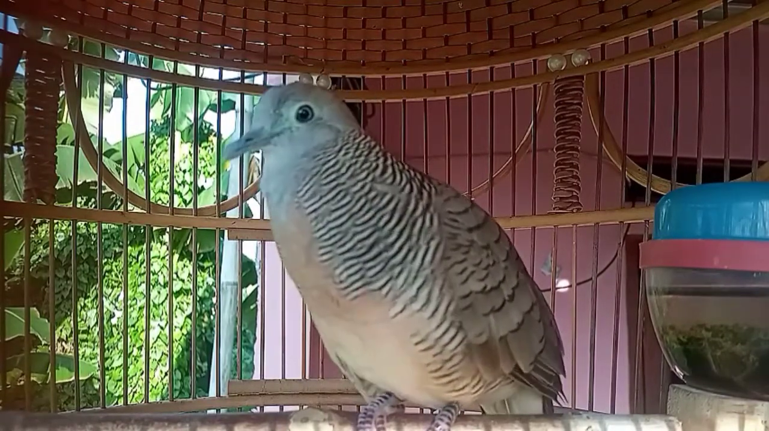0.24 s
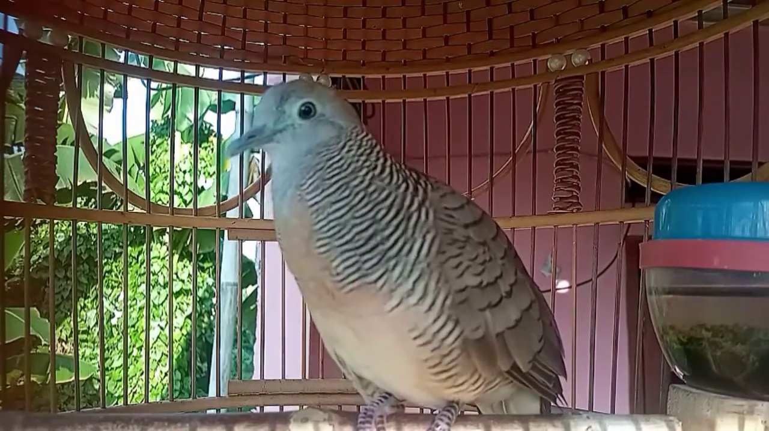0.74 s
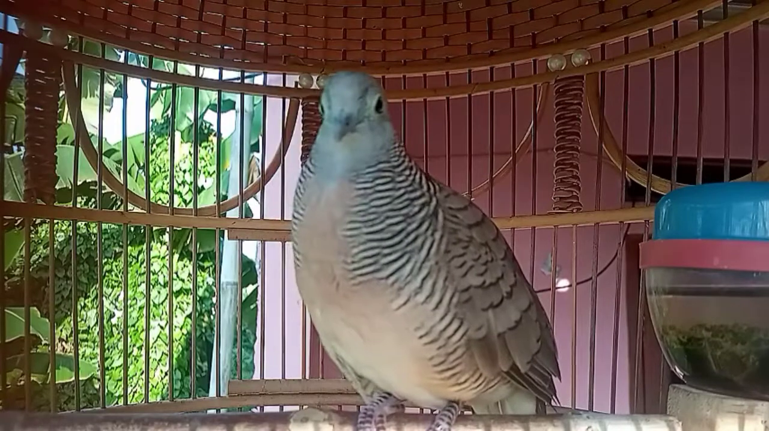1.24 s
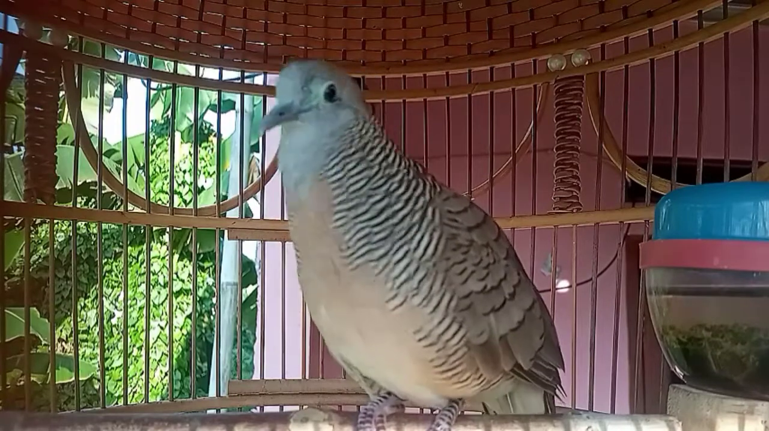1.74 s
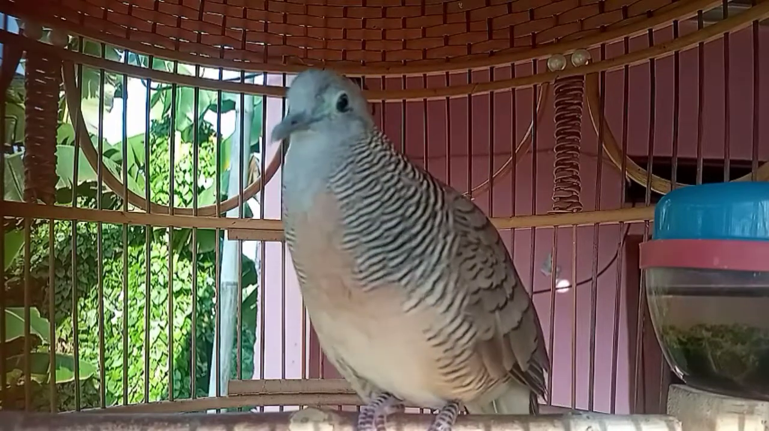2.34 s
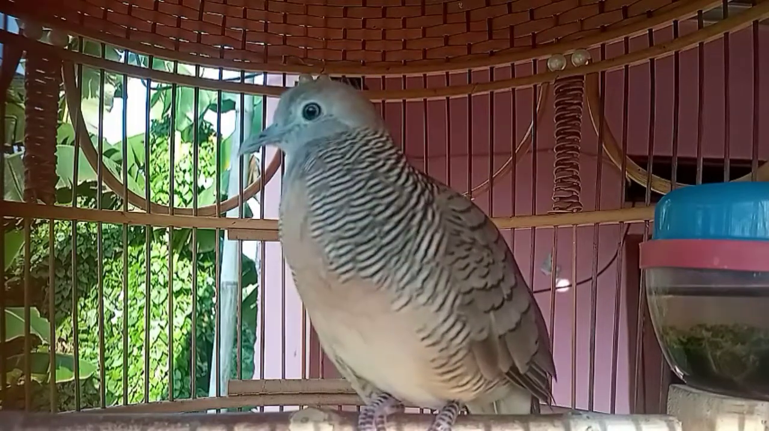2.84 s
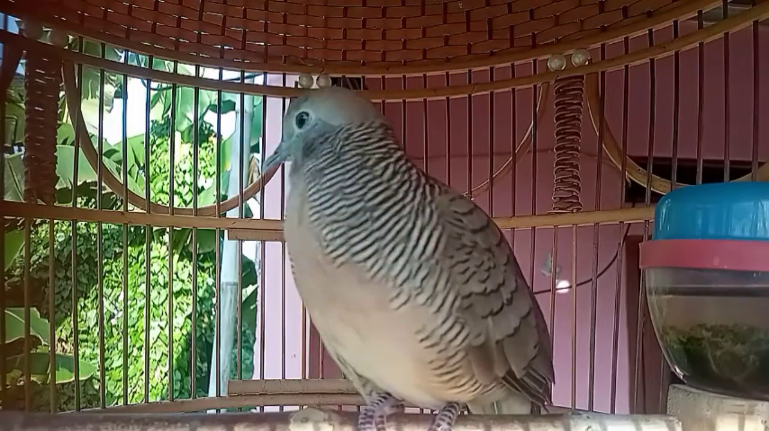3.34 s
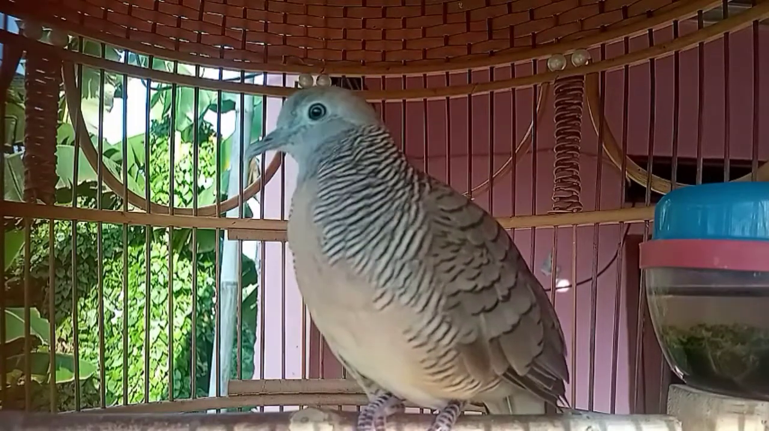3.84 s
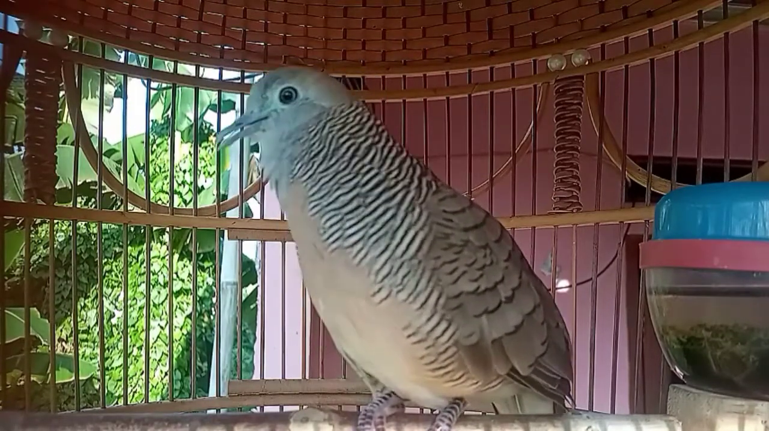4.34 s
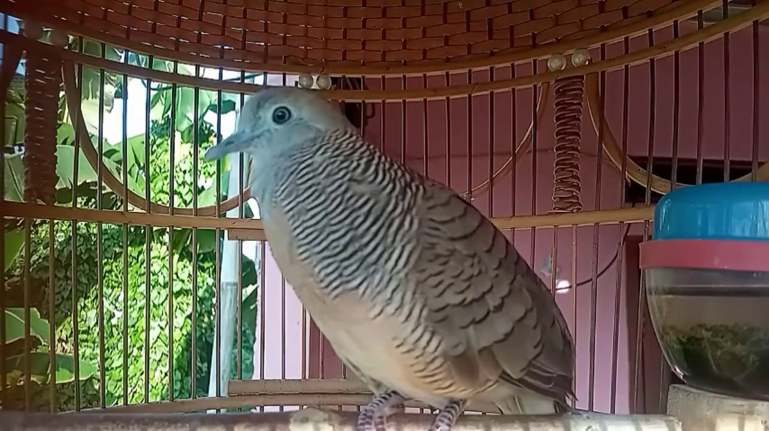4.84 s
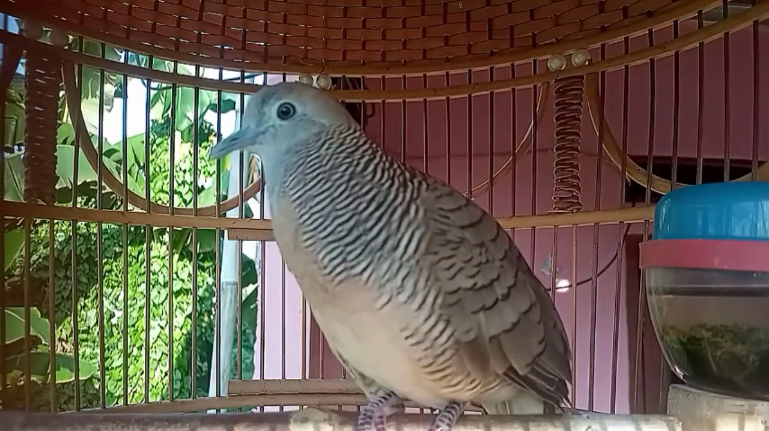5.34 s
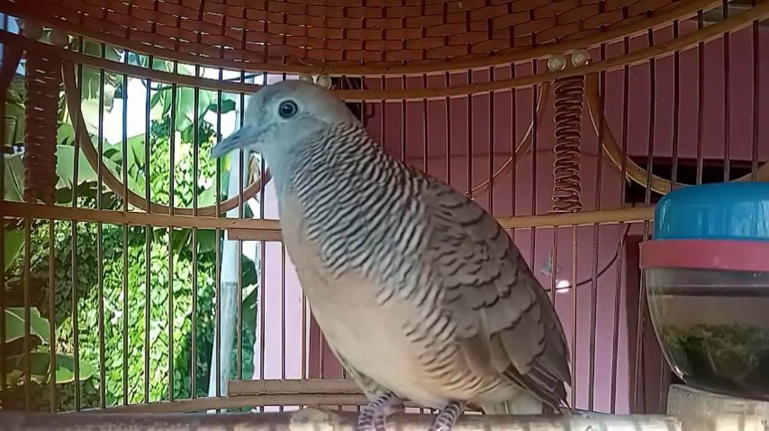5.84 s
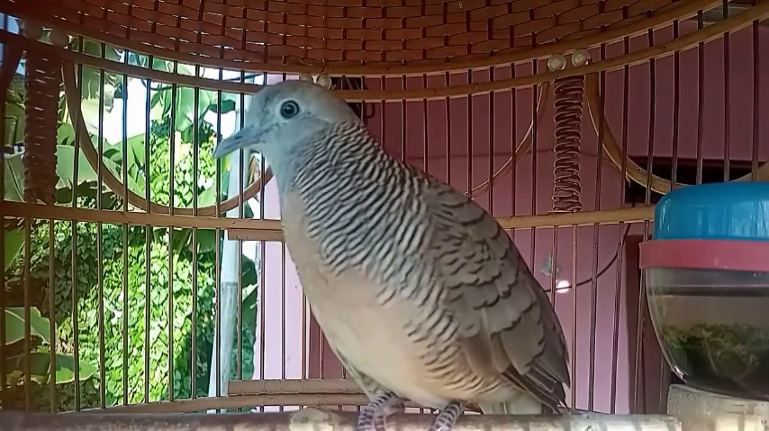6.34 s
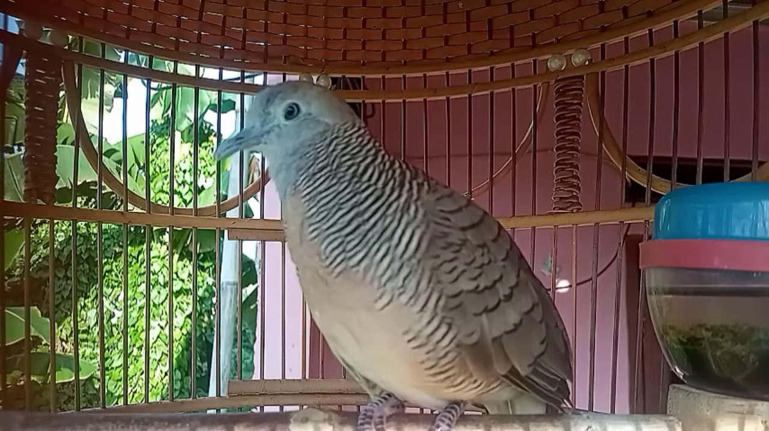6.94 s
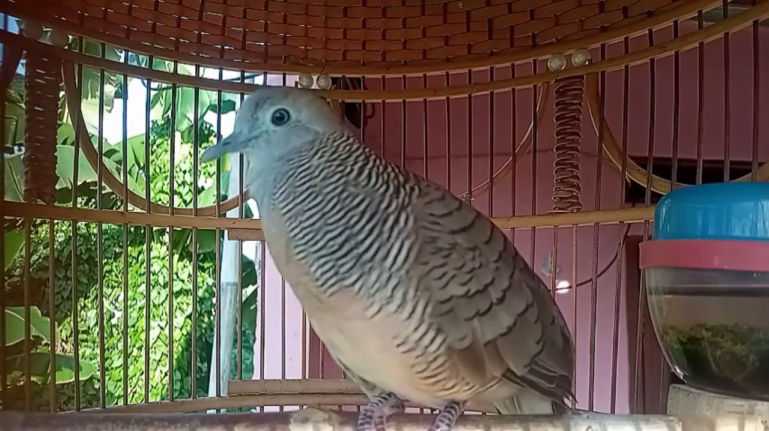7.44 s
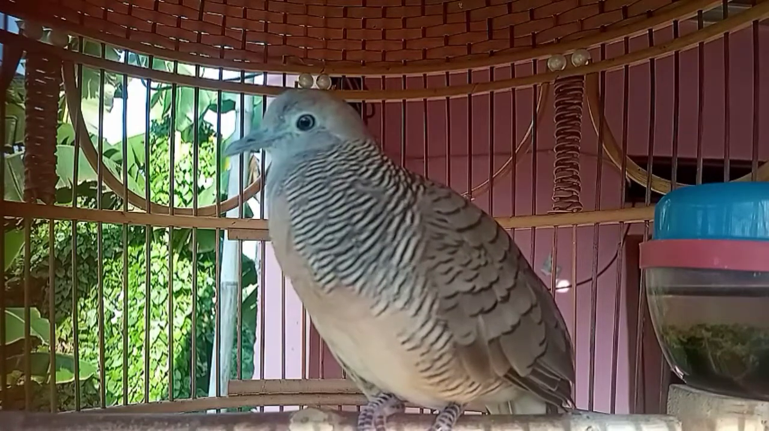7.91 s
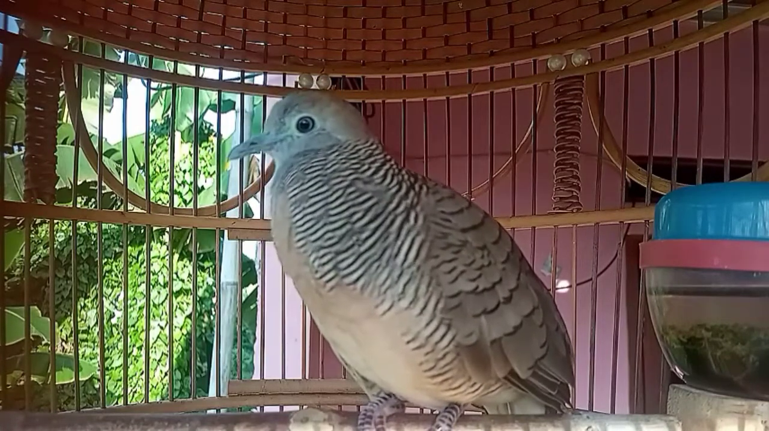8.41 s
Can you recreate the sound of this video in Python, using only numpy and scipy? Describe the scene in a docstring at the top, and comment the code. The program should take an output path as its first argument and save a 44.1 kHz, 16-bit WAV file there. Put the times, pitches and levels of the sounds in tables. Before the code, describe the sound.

Outdoors on a sheltered porch, a steady thin insect shrill and airy hiss sit over soft, surging traffic rumble. At 0 s a close dove is finishing a loud phrase as a neighbouring dove begins an even trill of short, hollow, popping coos, about six a second, until 1.4 s. A fainter far dove runs through seven slowing coos from 0.65 s, and a songbird flicks bright whistles from 0.85 to 2 s. Dry cage ticks fall occasionally. The close dove's quick four-note phrase, creaky at its onsets, comes at 1.7 s, louder at 4.4 s and again at 7.1 s. Twitter rasps near 2.1-2.5 s; another dove coos at 2.7-3.6 s. The trill returns at 4.9-6.5 s, with twitter at 5.2-5.8 s. Faint hoots and chips follow at 6 s, then songbird whistles from 6.3 s and the far run from 7 to 8.2 s, leaving insects and traffic.

```python
"""Caged zebra doves coo on a porch over shrill insects (narrow noise), rumbling traffic and air (wide noise).
A close dove is mid-phrase as a trilling dove starts beside it; gliding tones with overtones make each coo.
A far dove's slowing run and a songbird's bending whistles follow, then cage ticks (noise bursts), twitter,
and a dove to the left near 3 s. The trill returns near 5 s, then the songbird and the far run near 7 s.
Loud peaks, chiefly the close dove's phrases, drive a limiter that ducks the whole mix."""
import sys
import numpy as np
from scipy import signal
from scipy.fft import rfft, irfft, next_fast_len
from scipy.io import wavfile
from scipy.ndimage import uniform_filter1d, map_coordinates

SR = 44100
rng = np.random.default_rng(int(sys.argv[2]) if len(sys.argv) > 2 else 0)


def dump_mix(stems):
    """Bounce the given channels to the path in sys.argv[1] as a 16-bit WAV at rate SR."""
    frames = np.atleast_2d(stems).T  # one column per channel
    limited = np.clip(frames, -1, 1)  # hard clip at full scale
    pcm = np.round(limited * 32767).astype(np.int16)
    wavfile.write(sys.argv[1], SR, pcm)


N = 382347

# each time the close dove sings its phrase: (time [s], stretch of the rhythm [ratio], relative level [dB])
PHRASE_STARTS = [(-.345, 1.005, -0.5), (1.684, 1.01, 1.2), (4.373, 0.94, 4), (7.081, 1, 2.5)]
# throat colour of the close and trilling doves' creaks: (frequency [Hz], gain [dB])
THROAT_COLOUR = [(300, -25.5), (700, -10.5), (1150, 4.5), (1600, -8.5), (2200, -33), (4000, -39),
                 (9000, -61)]


def amp(db):
    """Decibels to gain."""
    return 10 ** (np.asarray(db) / 20)


def unit(x):
    """Scale to rms 1."""
    return x / np.sqrt(np.mean(x ** 2) + 1e-20)


def along(points, hz):
    """Read (frequency, value) points on a log frequency axis."""
    f, v = np.transpose(points)
    return np.interp(np.log(hz + 1), np.log(f + 1), v)


def curves(rows):
    """One value per sample for each column after the time."""
    s, *cols = np.transpose(rows)
    return [np.interp(np.arange(N) / SR, s, c) for c in cols]


def wobble(rate, size=N):
    """A smooth random curve, rate knots a second."""
    knots = rng.standard_normal(int(N * rate / SR) + 4)
    return map_coordinates(knots, [np.arange(size) * rate / SR])


def filtered(x, response):
    """Shape x with a complex response of frequency."""
    m = next_fast_len(N + SR // 2)
    return irfft(rfft(x, m) * response(np.fft.rfftfreq(m, 1 / SR)), m)[..., :N]


def add(track, s, sound):
    """Mix a sound into a track at time s."""
    at = round(s * SR) + np.arange(len(sound))
    inside = (at >= 0) & (at < N)
    track[at[inside]] += sound[inside]


def pan(lean_db):
    """Left and right gains; the left is lean_db louder."""
    return amp([[lean_db / 2], [-lean_db / 2]])


def noise(gain, alike):
    """Stereo noise of rms 1 with a given colour and left-right likeness."""
    turn = np.arccos(np.clip(alike, -1, 1)) / 2
    mid, side = filtered(rng.standard_normal((2, N)), gain) * [[np.cos(turn)], [np.sin(turn)]]
    return unit(np.array([mid + side, mid - side]))


def placed(x, lean_db, wet_db):
    """The direct sound and the porch's diffuse tail: stereo noise that decays at its own pace in each band."""
    # porch decay: (frequency [Hz], time to fall 60 dB [s]); times under 0.02 s are raised to it
    porch_decay = [(200, 0.16), (1200, 0.45), (3500, 0.35), (7000, 0.42), (12000, 0.014)]
    hz, t, z = signal.stft(rng.standard_normal((2, SR // 2)), SR, nperseg=256)
    t60 = np.maximum(along(porch_decay, hz), .02)[:, None]
    tail = signal.istft(z * amp(-60 * t / t60), SR, nperseg=256)[1]
    room = signal.fftconvolve(x[None], tail / np.linalg.norm(tail[0]), axes=1)[:, :N]
    return pan(lean_db) * (x + amp(wet_db) * room)


def resonance(f, hz, width):
    """The response of one ringing hollow."""
    return 1j * f * width / (hz * hz - f * f + 1j * f * width)


def reflections(f, echoes):
    """The response of delayed copies, one for each (delay [s], level [dB])."""
    return sum(amp(db) * np.exp(-2j * np.pi * f * delay) for delay, db in echoes)


def bouts(rows, rest_db, edge_s):
    """A gain that rests low and rises smoothly for each (start [s], end [s], level [dB])."""
    t = np.arange(N) / SR
    gain = amp(rest_db)
    for start, end, db in rows:
        gain = gain + amp(db) * (np.tanh((t - start) / edge_s) - np.tanh((t - end) / edge_s)) / 2
    return gain


def open_air():
    """The hiss of open air: coloured noise whose level barely wavers."""
    # air colour: (frequency [Hz], relative level [dB])
    air_colour = [(300, -8.5), (750, -4), (1300, -12.5), (2000, -10.5), (3000, -15), (4500, 3.5),
                  (5700, 3.5), (7000, 5), (8300, -9), (9500, -4), (11200, -31), (12200, -55), (15500, -18)]
    hiss = noise(lambda f: amp(along(air_colour, f)), alike=0.023)
    return amp(-51.5 + 0.4 * wobble(3.4)) * pan(10.4) * hiss


def rumble():
    """Traffic noise whose deep, middle and upper bass each surge on their own."""
    # rumble colour: (frequency [Hz], relative level [dB])
    rumble_colour = [(25, -28), (55, -8.5), (95, 1), (125, 4.5), (190, -10), (320, -22.5), (600, -60.5)]
    surge_db = 3.2
    bands = [(0, 80), (80, 140), (140, 1000)]  # Hz
    steady = noise(lambda f: amp(along(rumble_colour, f)), alike=0.99)
    surging = 0
    for lo, hi in bands:
        surging = surging + amp(surge_db * wobble(9.8)) * filtered(steady, lambda f: (f >= lo) & (f < hi))
    return unit(surging)


def traffic():
    """Distant traffic: the surging rumble on a slow swell."""
    # rumble swell: (time [s], relative level [dB])
    rumble_swell = [(0, -58.5), (1, -56.5), (1.55, -53.5), (4.2, -49), (5.4, -53), (6.5, -49.5),
                    (7.4, -54.5), (8.1, -48.5), (8.67, -49)]
    swell_db, = curves(rumble_swell)
    return amp(swell_db + 5.5) * pan(4.2) * rumble()


def tyres():
    """The hum of tyres on a far road: coloured noise that swells and wavers."""
    # tyre hum colour: (frequency [Hz], relative level [dB])
    tyre_colour = [(120, -30), (210, -6.5), (320, -2), (430, -13), (600, -19), (1200, -22), (2200, -24.5),
                   (4000, -42)]
    # tyre hum swell: (time [s], relative level [dB])
    tyre_swell = [(0.0, -73), (1.49, -61.5), (1.76, -73), (2.77, -59.5), (4.83, -67), (6.88, -59.5),
                  (7.12, -64), (8.31, -55), (8.67, -54)]
    swell_db, = curves(tyre_swell)
    hum = noise(lambda f: amp(along(tyre_colour, f)), alike=0.43)
    return amp(swell_db + 6.5 + 3.1 * wobble(7)) * pan(4.6) * hum


def sparrow_chatter():
    """Far sparrows merged into a band of noise that flickers in bouts."""
    # chatter colour: (frequency [Hz], relative level [dB])
    chatter_colour = [(2000, -21), (2800, -0.5), (3500, 2), (4200, -1), (5200, -43)]
    # bouts of chatter: (start [s], end [s], relative level [dB])
    chatter_bouts = [(-.1, .25, -70), (1.45, 1.8, -61), (2.3, 2.94, -51), (3.08, 3.2, -51),
                     (3.39, 3.47, -64), (4.74, 4.9, -69), (6.2, 6.36, -54.5), (6.82, 6.98, -54.5),
                     (8.4, 8.8, -62)]
    chatter = noise(lambda f: amp(along(chatter_colour, f)), alike=0.13)
    flicker = amp(6.5 + 3.26 * wobble(14))
    return bouts(chatter_bouts, rest_db=-67.5, edge_s=0.058) * flicker * pan(9.6) * chatter


def insect_band(f, hz, width):
    """The response of a narrow peak that halves 0.74 width to either side."""
    return 1 / (1 + ((f - hz) / (0.74 * width)) ** 2)


def insect_shrill():
    """Steady shrilling: narrow bands of noise, each with its own place."""
    # shrill bands: (centre [Hz], nominal width [Hz], level [dB], left over right [dB])
    shrill_bands = [(6467, 180, -43, 14), (10493, 342, -41, -9), (9995, 430, -48.5, -7)]
    return sum(amp(db) * pan(lean_db) * noise(lambda f: insect_band(f, hz, width), alike=0.028)
               for hz, width, db, lean_db in shrill_bands)


def insect_whine():
    """A thin whine of very narrow noise lines that comes and goes."""
    # whine lines: (frequency [Hz], relative level [dB])
    whine_lines = [(4430, -10.5), (5118, 0), (5700, -8), (7080, -11.5)]
    # bouts of whine: (start [s], end [s], level [dB])
    whine_bouts = [(2.3, 2.85, -47.5), (3.45, 3.8, -50.5), (3.82, 4.65, -50), (5.92, 6.7, -45)]
    lines = lambda f: sum(amp(db) * insect_band(f, hz, 28) for hz, db in whine_lines)
    return bouts(whine_bouts, rest_db=-57.5, edge_s=0.027) * noise(lines, alike=0.031)


def cage_ticks():
    """Short dry knocks of the cane bars: fast-fading noise through wood, each with a bright edge."""
    # ticks: (time [s], knock level before the wood [dB], edge level before its filter [dB])
    tick_rows = [(0.935, -55, -37), (1.487, -41, -37), (3.768, -63, -50.5), (3.929, -103, -37),
                 (5.59, -63, -39.5), (6.718, -55, -37.5), (8.483, -74, -46)]
    # colour of the cage wood: (frequency [Hz], gain [dB])
    wood_colour = [(200, -20), (700, -11), (1400, 11), (2200, -52), (4000, -51)]
    knock, edge, t = np.zeros(N), np.zeros(N), np.arange(SR // 10) / SR
    knock_t60_s, edge_t60_s = 0.018, 0.054
    for s, knock_db, edge_db in tick_rows:
        add(knock, s, amp(knock_db - 60 * t / knock_t60_s) * rng.standard_normal(len(t)))
        add(edge, s, amp(edge_db - 60 * t / edge_t60_s) * rng.standard_normal(len(t)))
    wood = filtered(knock, lambda f: amp(along(wood_colour, f)))
    snap = filtered(edge, lambda f: 1 / (1 + (f / 7500) ** 4) / (1 + (2200 / (f + 1)) ** 4))
    return placed(wood + snap, lean_db=32.0, wet_db=-10.5)


def whistles(rows, rasp, turn=.5, swell_db=0, flutter_hz=400):
    """Tones that bend through three pitches and swell or fade on the way, with a quick random flutter."""
    song = np.zeros(N)
    flutter = 1 + rasp * wobble(flutter_hz)
    for s, length, start_hz, middle_hz, end_hz, db in rows:
        u = np.linspace(0, 1, max(int(length * SR), 8))  # progress through the note
        hz = np.interp(u, [0, np.clip(turn, 0, 1), 1], [start_hz, middle_hz, end_hz])
        hz = uniform_filter1d(hz, size=len(u) // 6, mode="nearest")  # round the bends
        hz = hz * np.take(flutter, round(s * SR) + np.arange(len(u)), mode="wrap")
        level = amp(db + swell_db * (u - 1.5)) * signal.windows.tukey(len(u), .2)
        add(song, s, level * np.sin(2 * np.pi * np.cumsum(hz) / SR))
    return song


def distant_hoots():
    """Faint distant hooting: low whistles with a random flutter."""
    # hoots: (time [s], length [s], start [Hz], middle [Hz], end [Hz], relative level [dB])
    hoot_rows = [(2.15, 0.32, 820, 817, 802, -63.5), (6.0, 0.33, 643, 634, 623, -59),
                 (6.26, 0.081, 810, 776, 724, -44), (6.28, 0.2, 1570, 1560, 1526, -56),
                 (6.3, 0.736, 675, 647, 627, -49), (6.8, 0.14, 753, 723, 718, -51)]
    return amp(1.5) * placed(whistles(hoot_rows, rasp=0.046), lean_db=2.5, wet_db=0.5)


def far_whistles():
    """Thin level whistles from far down the garden."""
    # whistles: (time [s], length [s], pitch [Hz], relative level [dB])
    thin_notes = [(0.651, 0.32, 4230, -54), (0.657, .2, 5330, -66), (1.24, 0.59, 5040, -55),
                  (1.245, 0.17, 5600, -53), (7.243, 0.068, 3990, -39.5), (7.793, 0.13, 3994, -48)]
    return whistles([(s, length, hz, hz, hz, db) for s, length, hz, db in thin_notes], rasp=0.0071)


def falling_chips():
    """Single chips, each a short whistle sweeping down."""
    # chips: (time [s], length [s], middle pitch [Hz], relative level [dB])
    chip_rows = [(0.062, 0.086, 3500, -48.5), (2.101, 0.0083, 3510, -33), (6.093, 0.02, 3740, -41.5),
                 (6.187, 0.059, 3856, -30), (7.909, 0.031, 3390, -40), (8.413, 0.048, 3406, -40.5)]
    sweep_hz = 203  # to either side of the middle
    notes = [(s, length, hz + sweep_hz, hz, hz - sweep_hz, db) for s, length, hz, db in chip_rows]
    return whistles(notes, rasp=.012)


def songbird():
    """High, middle and low whistles in turn, each swelling and flicking up at its end."""
    # notes: (time [s], length [s], start [Hz], turning pitch [Hz], end [Hz], relative level [dB])
    song_notes = [(.85, 0.086, 5570, 5680, 7620, -26.5), (1.035, 0.12, 4350, 4540, 6570, -29.5),
                  (1.22, 0.1, 2890, 3280, 4200, -33), (1.37, 0.11, 6550, 5710, 7850, -20),
                  (1.59, 0.085, 4060, 4600, 5900, -27.5), (1.79, 0.09, 2910, 3240, 4660, -30.5),
                  (1.94, 0.1, 6220, 5450, 7920, -23.5), (6.305, 0.11, 7270, 5690, 7780, -22.5),
                  (6.55, 0.087, 4280, 4550, 5830, -25), (6.7, 0.11, 2800, 3150, 4230, -31.5),
                  (6.87, 0.098, 6590, 5765, 7200, -14.5), (7.095, 0.066, 4560, 4390, 6060, -23),
                  (7.27, 0.065, 2855, 3200, 4040, -25.5), (7.425, 0.11, 6500, 5670, 7880, -19.5)]
    return whistles(song_notes, rasp=.02, turn=.66, swell_db=9.0)


def twitter():
    """Quick strings of finely rasping strokes that fade as they fall."""
    # strokes: (time [s], end pitch [Hz], relative level [dB])
    strokes = [(2.095, 4880, -30), (2.16, 4930, -33.5), (2.264, 5200, -31.5), (2.311, 5100, -43),
               (2.39, 4930, -30.5), (2.442, 5360, -31), (2.49, 4700, -38), (5.204, 4900, -33.5),
               (5.26, 5160, -44), (5.321, 5170, -32), (5.441, 4620, -44), (5.62, 5090, -49),
               (5.385, 4270, -36.5), (5.5, 5110, -30.5), (5.564, 4760, -32), (5.673, 5110, -31),
               (5.728, 4940, -31), (5.78, 4160, -36.5)]
    length_s, start_hz = .07, 6760
    notes = [(s, length_s, start_hz, (start_hz + hz) / 2, hz, db) for s, hz, db in strokes]
    return whistles(notes, rasp=.05, swell_db=-5, flutter_hz=1100)


def garden_birds():
    """Chirps, twitter and hoots, with their reflections off the porch."""
    chirps = amp(-4.5) * placed(songbird() + falling_chips() + far_whistles(), lean_db=7.5, wet_db=4)
    twitters = amp(-16.5) * placed(twitter(), lean_db=7, wet_db=7.5)
    return chirps + twitters + distant_hoots()


def coos(notes, low_hz, rise_s, droop, swell_s, fade_s, overtones_db, jitter, pop, pop_s, rattle):
    """Each coo is a nearly pure tone that pops out, scoops up to its top pitch and droops as pressure fades."""
    rattle_hz, rattle_s = 184, 0.006  # the throat's flutter as a coo catches, and its decay either side
    overtone_bloom = 3  # how steeply the upper overtones fade below the top pitch
    voice = np.zeros(N)
    unsteady = 1 + jitter * wobble(150)
    for s, length, top_hz, end_hz, db, *warble in notes:
        t = np.arange(-SR // 25, int((length + 0.034) * SR)) / SR
        u = np.clip(t / length, 0, 1.15)  # progress through the coo
        scoop = (top_hz - low_hz) / (1 + np.exp(t / rise_s))
        hz = top_hz - scoop - (top_hz - end_hz) * u ** droop
        if warble:  # the pitch bends to and fro around the later part of the note
            hz = hz - warble[0] * np.sin(2 * np.pi * (u - .55) / 0.392) * np.exp(-((u - .76) / 0.33) ** 2)
        drift = np.take(unsteady, round(s * SR) + np.arange(len(t)), mode="wrap")
        phase = 2 * np.pi * np.cumsum(hz * drift) / SR
        pressure = 1 / (1 + np.exp((.002 - t) / swell_s)) / (1 + np.exp((t - length) / fade_s + 1))
        pressure = pressure * np.clip((t + .018) / .008, 0, 1)  # silent until shortly before the onset
        # a brief surge of pressure as the tone catches
        burst = 1 + pop * np.exp(-((t - pop_s) / .0028) ** 2)
        shake = np.cos(2 * np.pi * rattle_hz * (t - pop_s)) * np.exp(-np.abs(t - pop_s) / rattle_s)
        burst = burst * (1 + rattle * shake)
        # overtones grow faster than the pressure, the upper ones only near the top pitch
        reach = np.minimum(hz / top_hz, 1) ** overtone_bloom
        overtones = sum(amp(level) * reach ** (k - 2) * np.sin(k * phase)
                        for k, level in enumerate(overtones_db, 2))
        add(voice, s + t[0], amp(db) * pressure * burst * (np.sin(phase) + pressure * overtones))
    return voice


def flutter_pulses(rows, throat):
    """Noise in uneven decaying pulses, about 300 a second, coloured by a throat."""
    pulses = np.zeros(N)
    for s, length, db in rows:
        t = np.arange(int(length * SR) + 1) / SR
        cycle = np.cumsum(300 * np.exp(0.18 * wobble(200, size=len(t)))) / SR
        grain = np.exp(-2 * (cycle % 1)) * np.tanh(rng.standard_normal(len(t)))
        add(pulses, s, amp(db) * signal.windows.tukey(len(t), .6) * grain)
    return filtered(pulses, lambda f: amp(along(throat, f)))


def far_beats():
    """(time [s], top pitch [Hz], relative level [dB]) of each coo in the far dove's slowing runs."""
    # runs of seven coos: (time [s], first gap [s], first top pitch [Hz], first relative level [dB])
    far_runs = [(0.649, .183, 1433, -30), (6.957, .186, 1415, -23)]
    slowing_s = .007  # each gap outlasts the one before by this much
    climb_hz, swell_db = 15, 1  # each coo is this much higher and louder than the one before
    return [(s + k * gap + slowing_s * k * (k - 1) / 2, hz + k * climb_hz, db + k * swell_db)
            for s, gap, hz, db in far_runs for k in range(7)]


def far_creaks():
    """The throat flutter that opens each coo of the far dove's runs."""
    # far throat colour: (frequency [Hz], gain [dB])
    far_throat = [(500, -34), (900, -31), (1180, 5), (1450, -7), (1800, -34), (4000, -59)]
    lead_s, length_s = .018, 0.0283
    flutter = flutter_pulses([(s - lead_s, length_s, db) for s, _, db in far_beats()], far_throat)
    return amp(11) * placed(flutter, lean_db=5, wet_db=0.5)


def far_dove():
    """Runs of falling coos that slow down and climb, with lower, flatter notes outside them."""
    # notes outside the runs: (time [s], length [s], top pitch [Hz], relative level [dB])
    far_calls = [(2.728, 0.043, 1147, -26.5), (2.82, 0.034, 1233, -30.5), (2.99, 0.029, 1238, -25),
                 (3.085, 0.051, 1215, -32.5), (4.2, 0.04, 1030, -46), (4.246, 0.12, 1215, -47),
                 (4.75, 0.059, 1353, -31.5), (6.63, 0.047, 1224, -25.5), (6.74, 0.024, 1264, -18),
                 (6.806, 0.021, 1309, -17.5), (6.88, 0.033, 1247, -20.5), (8.36, 0.19, 1198, -50.5)]
    length_s, run_fall_hz, call_fall_hz = 0.0878, 153.6, 57
    notes = [(s, length_s, hz, hz - run_fall_hz, db) for s, hz, db in far_beats()]
    notes += [(s, length, hz, hz - call_fall_hz, db) for s, length, hz, db in far_calls]
    voice = coos(notes, low_hz=1133, rise_s=0.0057, droop=1.345, swell_s=0.0079, fade_s=0.017,
                 overtones_db=[-37.5, -16.5, -69.5, -26.0], jitter=0.0094, pop=0.18, pop_s=0.0064, rattle=0.15)
    return amp(1.0) * placed(voice, lean_db=6.0, wet_db=-7.5)


def opening_creaks():
    """Throat flutters of the other doves, echoing in the porch."""
    # creaks: (time [s], length [s], relative level [dB])
    creak_rows = [(.288, 0.011, -24), (2.705, 0.017, -29.5), (6.591, 0.032, -25)]
    # throat colour: (frequency [Hz], gain [dB])
    opening_throat = [(400, -75), (900, -12.5), (1500, 5.5), (1800, -15), (2300, -25.5), (4000, -21),
                      (9000, -56)]
    return amp(17.5) * placed(flutter_pulses(creak_rows, opening_throat), lean_db=9.0, wet_db=-2)


def left_dove():
    """A level-pitched voice that pops, then swells; echoes join its coos and smear the third harmonic."""
    # coos: (time [s], length [s], top pitch [Hz], relative level [dB])
    left_coos = [(2.747, 0.053, 1350, -11.5), (2.873, 0.026, 1312, -15), (2.95, 0.026, 1325, -11),
                 (3.029, 0.058, 1341, -13.5), (3.144, 0.083, 1347, -11), (3.341, 0.066, 1355, -10),
                 (3.529, 0.051, 1307, -15), (3.598, 0.05, 1343, -14.5)]
    # walls behind the dove: (delay [s], level [dB])
    left_echoes = [(.046, -19), (.102, -15)]
    fall_hz, third_db = 40.6, -32.5
    shape = dict(low_hz=1190, rise_s=.007, droop=2.48, swell_s=.009, fade_s=.008,
                 jitter=0.006, pop=.9, pop_s=0.0065, rattle=0.13)
    voice = np.zeros(N)
    for s, length, hz, db in left_coos:
        # taking off the coo's level keeps the third harmonic as strong in soft coos as in loud ones
        voice += coos([(s, length, hz, hz - fall_hz, db)], overtones_db=[-44, third_db - db], **shape)
    voice = filtered(voice, lambda f: 1 + reflections(f, left_echoes))
    treble = filtered(voice, lambda f: f > 2000)
    body = placed(voice - treble, lean_db=6, wet_db=-11)
    return amp(-6.5) * (body + placed(treble, lean_db=7.5, wet_db=-3))


def trilling_dove():
    """Each scoop sets the cage's hollow ringing; ring and reflections beat against the note, and a brief surge
    of pressure makes it pop."""
    # coos: (time [s], length [s], level before the cage and porch [dB])
    trill_coos = [(.024, 0.069, -22), (0.173, 0.072, -20), (.3264, 0.078, -20.5), (0.4835, .077, -19.5),
                  (0.649, 0.072, -19.5), (0.813, 0.07, -19), (.992, .065, -19.5), (1.189, .064, -19),
                  (1.3413, .059, -19.5), (4.8593, .15, -17.5), (5.034, 0.02, -19), (5.102, 0.013, -19.5),
                  (5.1692, 0.016, -18.5), (5.2462, .0236, -18.5), (5.337, 0.03, -20),
                  (5.4517, 0.053, -19.5), (5.6163, 0.055, -19.5), (5.783, 0.061, -19.5),
                  (5.9413, 0.061, -19.2), (6.0943, 0.058, -19), (6.262, 0.059, -20), (6.43, .064, -20)]
    # the hollow of the cage: (frequency [Hz], width [Hz], gain [dB], phase [rad])
    cage_ring = [(997.8, 13.6, 19.4, -1.82)]
    # reflections from the cage roof out to the far wall: (delay [s], level before dulling [dB])
    trill_echoes = [(.002775, -1.8), (.01039, -9.7), (.02744, -16.5), (.08318, -16)]
    top_hz, overshoot_hz, settle_s, fall_hz = 1219, 55, 0.02, 139.6
    creak_lead_s, creak_s = .026, 0.024  # the flutter that opens each coo
    notes = []
    for s, length, db in trill_coos:
        aim_hz = top_hz + overshoot_hz * np.exp(-length / settle_s)  # brief coos aim higher
        notes.append((s, length, aim_hz, aim_hz - fall_hz, db))
    voice = coos(notes, low_hz=732, rise_s=.00643, droop=1.95, swell_s=.00566, fade_s=.0016,
                 overtones_db=[-37, -50], jitter=.003, pop=.96, pop_s=.01, rattle=.06)
    ring = lambda f: sum(amp(db) * np.exp(1j * turn) * resonance(f, hz, w) for hz, w, db, turn in cage_ring)
    dull = lambda f: 1 / (1 + (f / 1800) ** 12)
    voice = filtered(voice, lambda f: 1 + ring(f) + dull(f) * reflections(f, trill_echoes))
    creak = flutter_pulses([(s - creak_lead_s, creak_s, db) for s, _, db in trill_coos], THROAT_COLOUR)
    return placed(voice + creak, lean_db=3.2, wet_db=-17)


def close_creaks():
    """Before each tone of the close dove catches, its throat flutters, nearly dry."""
    # creaks within every phrase: (time from its start [s], length [s], relative level [dB])
    phrase_creaks = [(-.072, 0.016, -28), (-.033, 0.031, -17.5), (0.116, 0.014, -24.5), (0.179, .02, -21),
                     (0.28, 0.016, -17)]
    rows = [(s + stretch * at, length, db + accent_db)
            for s, stretch, db in PHRASE_STARTS for at, length, accent_db in phrase_creaks]
    return amp(19) * placed(flutter_pulses(rows, THROAT_COLOUR), lean_db=4, wet_db=-19.0)


def close_dove():
    """One loud four-note phrase, repeated close by with little porch tail."""
    # notes: (time from phrase start [s], length [s], top [Hz], end [Hz], relative level [dB], warble [Hz])
    phrase_notes = [(0, .107, 1349, 1194, 0.5, 58), (0.128, 0.0308, 1361, 1090, 1.5, -5),
                    (0.192, .034, 1315, 1110, 1, -1), (0.292, .094, 1324, 1095, -1.5, -2)]
    notes = [(s + stretch * at, length, top_hz, end_hz, db + accent_db, warble)
             for s, stretch, db in PHRASE_STARTS
             for at, length, top_hz, end_hz, accent_db, warble in phrase_notes]
    voice = coos(notes, low_hz=706, rise_s=0.00595, droop=4.75, swell_s=0.0028, fade_s=0.0014,
                 overtones_db=[-26.0, -42.5, -38.5, -28.5, -46.0], jitter=0.0049,
                 pop=0.071, pop_s=0.00835, rattle=0.4)
    return amp(-6.5) * placed(voice, lean_db=4.0, wet_db=-23.0)


def scene():
    """All birds over the garden's steady sound."""
    background = open_air() + traffic() + tyres() + sparrow_chatter() + insect_shrill() + insect_whine()
    creaks = far_creaks() + opening_creaks() + close_creaks()
    doves = far_dove() + left_dove() + trilling_dove() + close_dove()
    return background + cage_ticks() + garden_birds() + creaks + doves


def limited(x, ceiling_db, attack_s, release_db_per_s):
    """Gain falls quickly when a peak passes the ceiling and recovers at a steady rate."""
    over_db = np.maximum(20 * np.log10(np.abs(x).max(axis=0) + 1e-9) - ceiling_db, 0)
    ramp = release_db_per_s * np.arange(N) / SR
    held_db = np.maximum.accumulate(over_db + ramp) - ramp
    keep = np.exp(-1 / (attack_s * SR))
    return x * amp(-signal.lfilter([1 - keep], [1, -keep], held_db))


def record(dry):
    """A limiter on the whole mix, a left channel about a millisecond late, and a steep treble cut."""
    lag_s, top_hz = .00103, 15800
    squeezed = limited(dry, ceiling_db=-8, attack_s=0.0026, release_db_per_s=116)
    # half the lag delays the left, half advances the right
    shift = lambda hz: np.exp(1j * np.pi * hz * lag_s * np.array([[-1], [1]]))
    return filtered(squeezed, lambda hz: (hz < top_hz) * shift(hz))


dry = scene()
out = record(dry)
dump_mix(out)
```